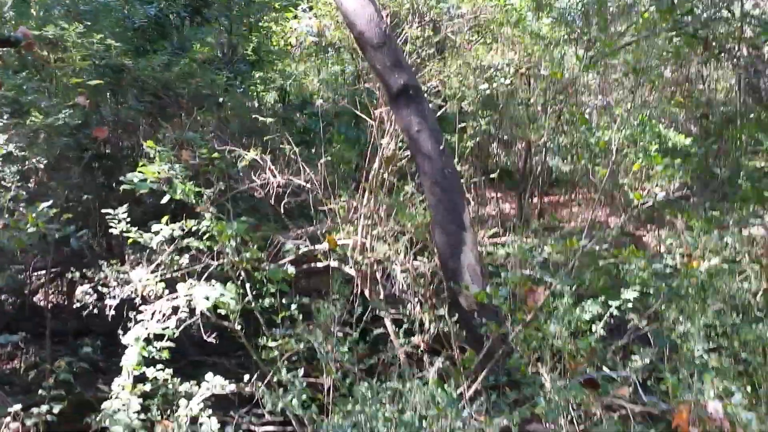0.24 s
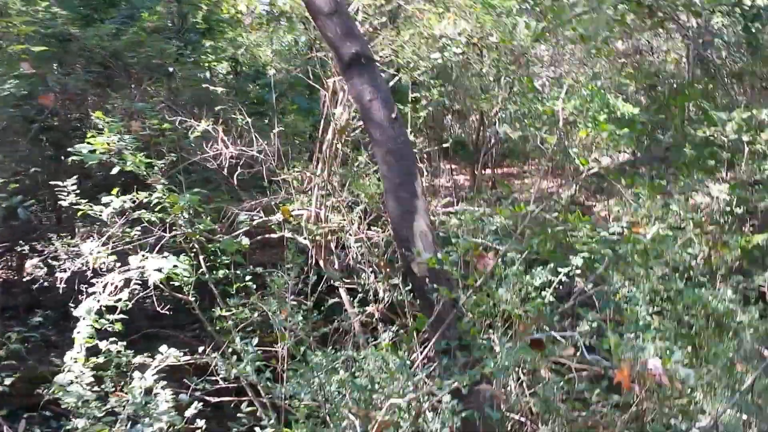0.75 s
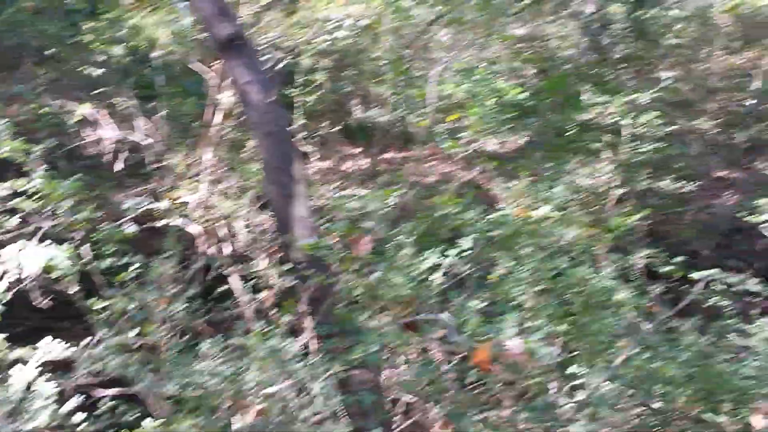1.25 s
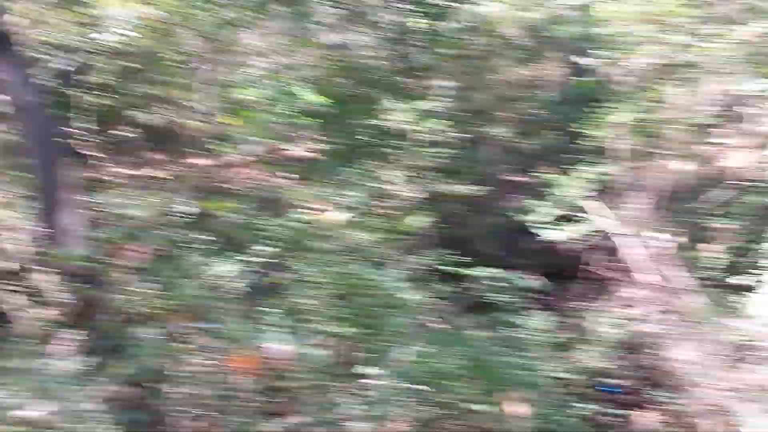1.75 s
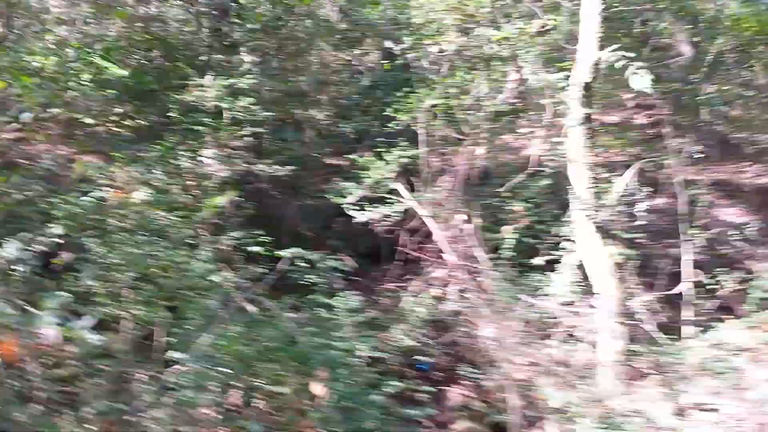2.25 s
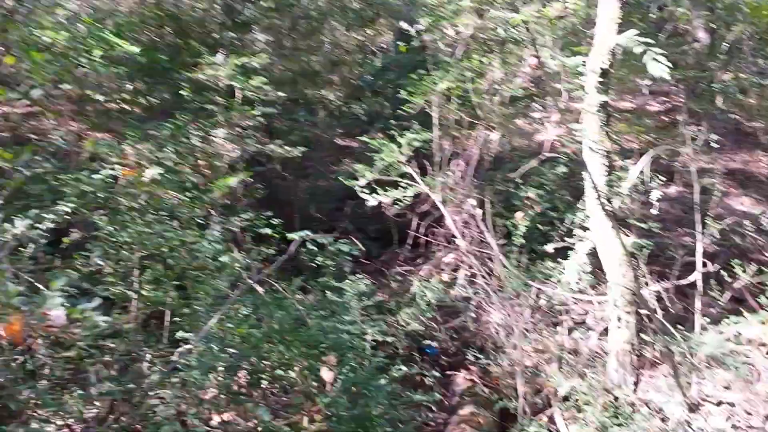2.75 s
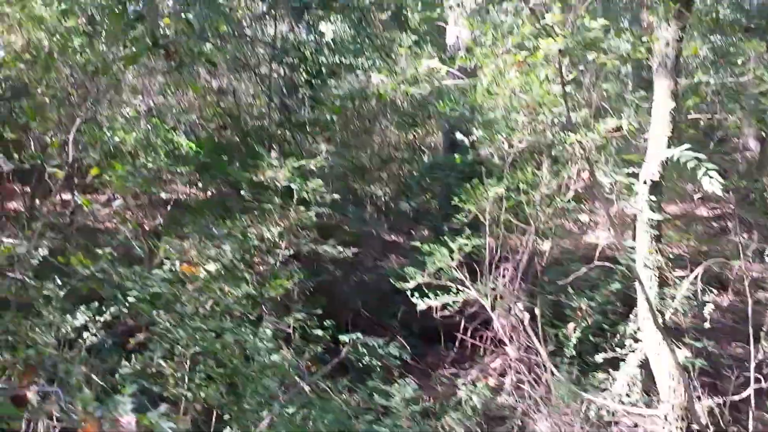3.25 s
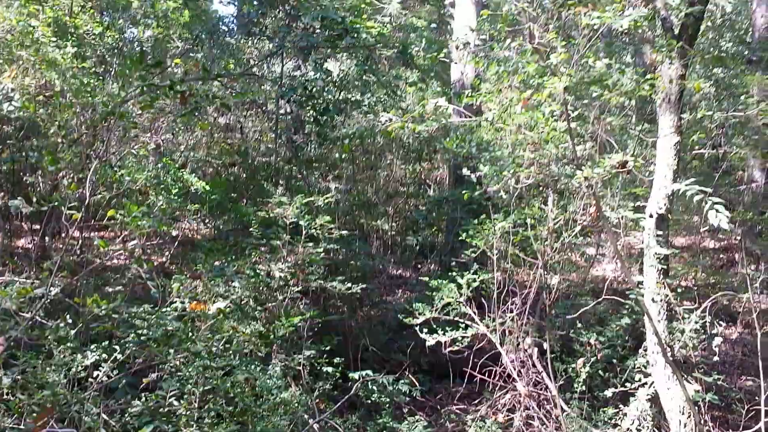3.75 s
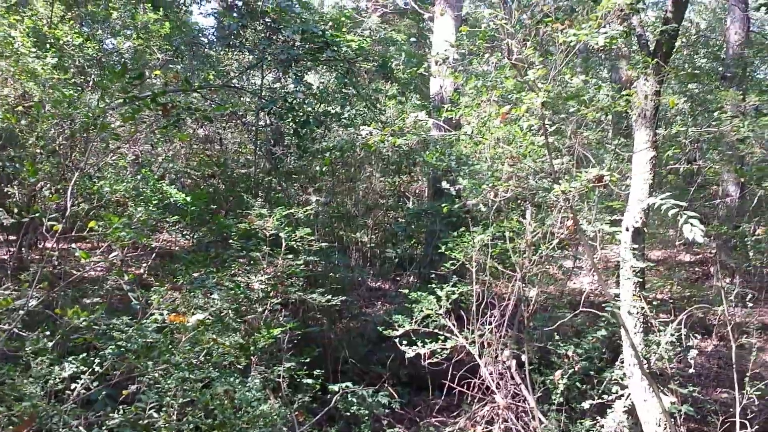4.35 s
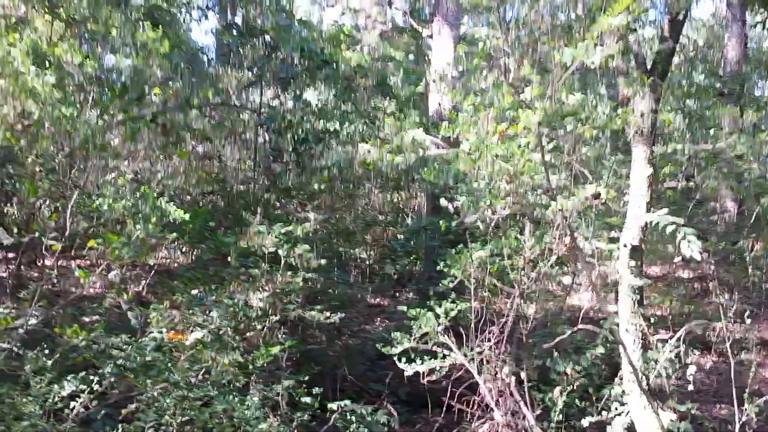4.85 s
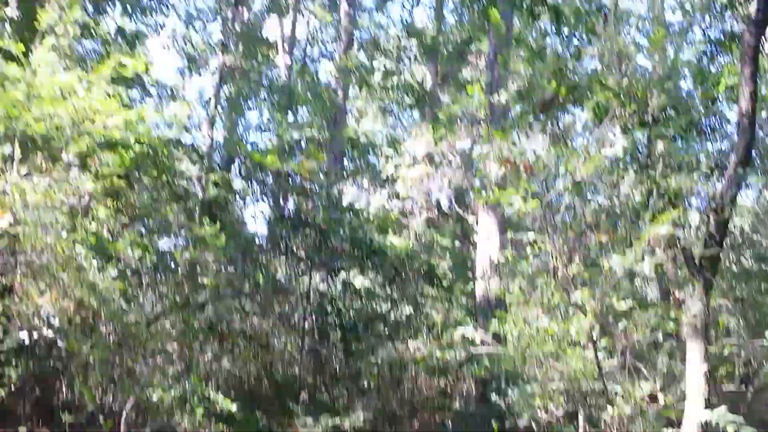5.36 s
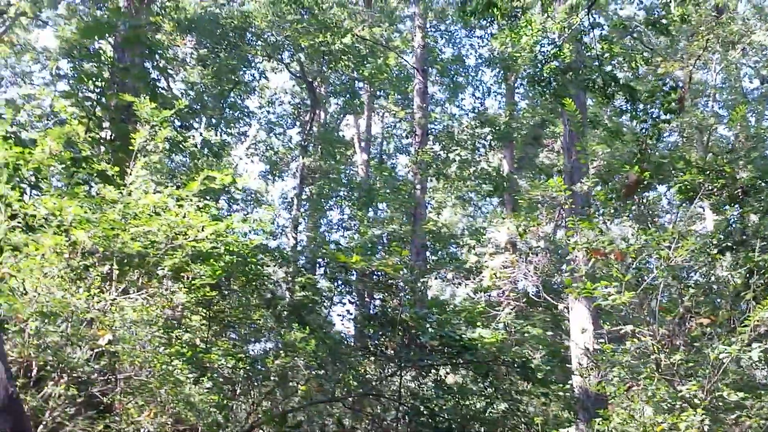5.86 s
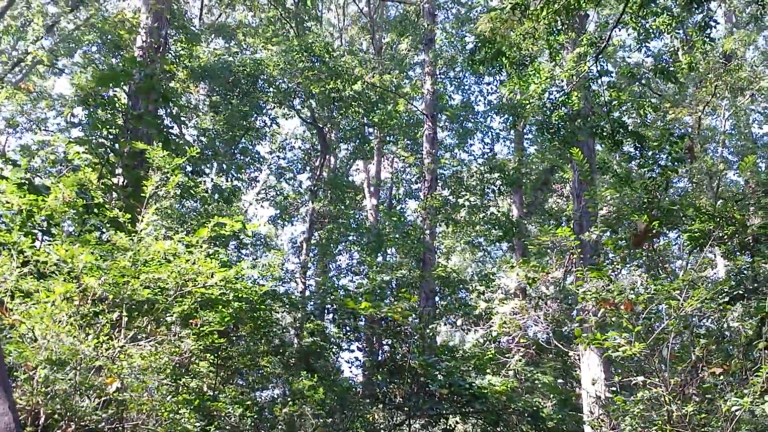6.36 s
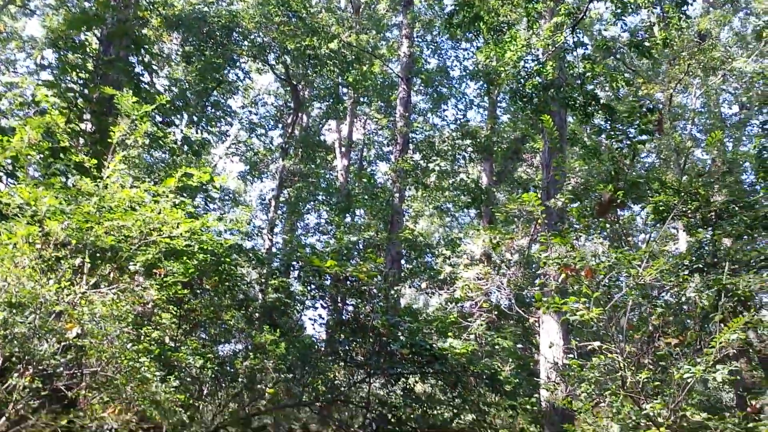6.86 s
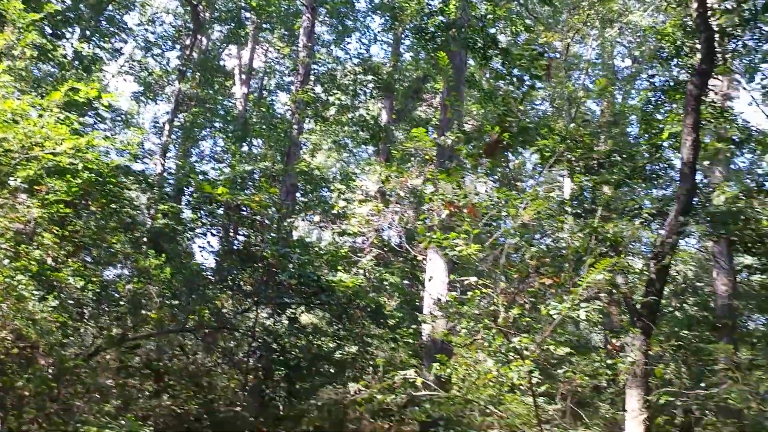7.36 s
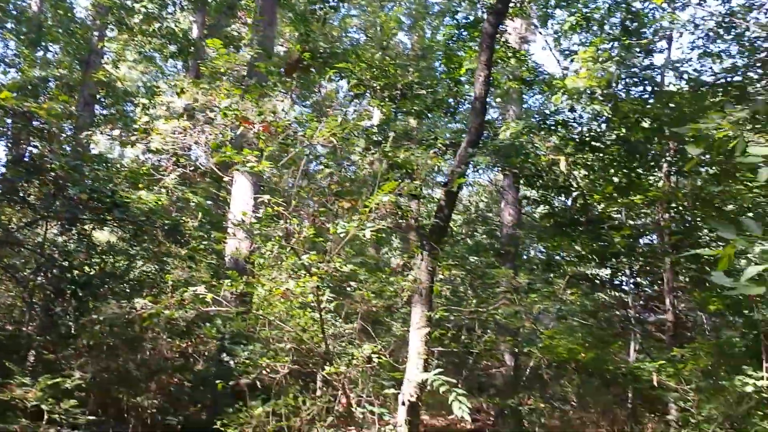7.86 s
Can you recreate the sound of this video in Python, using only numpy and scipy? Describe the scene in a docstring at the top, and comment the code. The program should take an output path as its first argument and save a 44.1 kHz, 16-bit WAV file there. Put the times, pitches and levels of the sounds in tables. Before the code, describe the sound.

Crickets trill in a shrill, steady chorus in woodland, with a few dry leaf crackles, twig ticks and a faint distant engine rumble.

```python
"""From the start, crickets trill in a sunny wood by stridulation: two near ones stroke about 15 times a
second over a far chorus near 7 kHz and faster, thinner trills. Under them lie soft air, hiss and a far
engine's swelling rumble. Within a second come a dull bump and the first crackles of dry leaves; then twigs
tick and light gusts pass. At 6.5 s a small animal chips once, a falling whistle scattered by the trees.
The rumble swells a last time as the engine sinks in pitch."""
import sys
import numpy as np
from scipy import signal
from scipy.fft import rfft, irfft, next_fast_len
from scipy.io import wavfile
from scipy.ndimage import uniform_filter1d

SR = 44100
rng = np.random.default_rng(int(sys.argv[2]) if len(sys.argv) > 2 else 0)


def to_wav(s):
    """Save 16-bit WAV."""
    ch = np.atleast_2d(s).T  # columns
    pcm = np.round(np.clip(ch, -1, 1) * 32767)  # PCM
    wavfile.write(sys.argv[1], SR, pcm.astype(np.int16))


N = 357651
TIME = np.arange(N) / SR
BINS = np.fft.rfftfreq(N, 1 / SR)


def gain_of(db):
    """Decibels to amplitude ratio."""
    return 10 ** (np.asarray(db) / 20)


def stereo(left_db, right_db):
    """A gain for each ear."""
    return gain_of([[left_db], [right_db]])


def unit_rms(x):
    """Normalises each channel to an rms of 1."""
    return x / np.sqrt(np.mean(x ** 2, axis=-1, keepdims=True) + 1e-20)


def curve(rows):
    """Linear interpolation of each column over time."""
    times, *columns = np.transpose(rows)
    return np.array([np.interp(TIME, np.sort(times), c) for c in columns])


def spectrum(rows):
    """Interpolation of each column over log frequency."""
    hz, *columns = np.transpose(rows)
    return np.array([np.interp(np.log(BINS + 1), np.log(hz + 1), c) for c in columns])


def add(mix, start_s, sound):
    """Superposes a sound on a stereo mix."""
    part = mix[:, max(round(start_s * SR), 0):][:, :sound.shape[-1]]
    part += sound[..., :part.shape[-1]]


def drift(per_s):
    """Random fluctuation of about unit size."""
    return np.interp(TIME * per_s, np.arange(6000), rng.standard_normal(6000))


def coloured(x, gain):
    """Filtering: multiplies the spectrum by a gain given on BINS."""
    size = next_fast_len(x.shape[-1], True)
    hz = np.fft.rfftfreq(size, 1 / SR)
    shape = np.array([np.interp(hz, BINS, g) for g in np.atleast_2d(gain)])
    return irfft(rfft(x, size) * shape, size)[:, :x.shape[-1]]


def resonance(hz, octaves):
    """A broad peak with gentle skirts."""
    return 1 / (1 + (np.log2((BINS + 1) / hz) / octaves) ** 2)


def scatter(x, t60_s=0.6, paths=3):
    """Reverberation by scattering from trunks and leaves; the paths change as the listener turns."""
    t = np.arange(SR) / SR
    tails = rng.standard_normal((paths, 2, SR)) * gain_of(-60 * t / t60_s) * (1 - np.exp(-t / 0.0017))
    tails /= np.linalg.norm(tails, axis=-1, keepdims=True)
    weights = [np.cos(np.pi * (0.668 * TIME + k / paths)) * np.sqrt(2 / paths) for k in range(paths)]
    return sum(signal.fftconvolve(np.atleast_2d(x * weight), tail, axes=1)[:, :N]
               for weight, tail in zip(weights, tails))


def cricket(strokes, per_s, top_hz, waver_hz, detune_hz, lag_cycles=0.52):
    """Stridulation: each wing stroke draws a scraper over a file, giving a tone that arches and sags."""
    attack_s, half_hold_s, release_s = 0.0035, 0.0085, 0.009
    swell_db, sag_hz = 0.5, 100
    stroke = np.round(strokes).astype(int)
    _, jitter, detune = rng.standard_normal((256, 3))[stroke % 256].T
    from_middle_s = (strokes - stroke) / per_s + 0.00056 * jitter
    along = np.clip(from_middle_s / half_hold_s, -2, 2)  # -1 to 1 during the hold
    hz = top_hz - sag_hz * along ** 2 + detune_hz * detune + waver_hz * drift(400)
    # the scraper bites, presses harder along the file, and lifts
    bite = (half_hold_s + from_middle_s) / attack_s
    lift = (half_hold_s - from_middle_s) / release_s
    contact = np.clip(1 + np.minimum(bite, lift), 0, 1)
    pressure = contact ** 2 * gain_of(swell_db * along / 2)
    lag = lag_cycles * drift(2.02)  # interaural phase shifts as the listener turns
    return np.sqrt(2) * pressure * np.sin(2 * np.pi * (np.cumsum(hz) / SR + np.array([lag, -lag]) / 2))


def near_cricket(start_s, per_s, top_hz, wet_db, flutter):
    """Amplitude modulation: leaves in the path make a close cricket flutter differently at each ear."""
    strokes = np.cumsum(per_s) / SR - start_s * per_s[0]
    song = cricket(strokes, per_s, top_hz, waver_hz=13.17, detune_hz=7.87, lag_cycles=0.33)
    leaves = 1 + flutter * np.array([drift(330), drift(270)])
    return song * leaves + gain_of(wet_db) * scatter(song[0])


# The nearest cricket swells on the left as the listener turns: (time [s], left [dB], right [dB])
NEAREST_LEVELS = [(0, -38.7, -42), (1.2, -39.3, -40.5), (1.7, -41, -39.5), (1.95, -34.3, -39),
                  (2.6, -30.8, -39), (3.1, -32.7, -38), (3.7, -34.5, -38), (4.3, -35.5, -37.5),
                  (5.3, -37, -41), (6.1, -39.7, -42), (7.0, -37.5, -42), (7.8, -34.7, -39.7)]
# Its neighbour moves toward the right ear: (time [s], left [dB], right [dB])
NEIGHBOUR_LEVELS = [(0, -38, -45), (0.8, -40.5, -44), (1.8, -40.5, -42.5), (2.3, -42, -41), (3.1, -42, -46),
                    (4.2, -40.5, -39.5), (5.3, -43, -41.5), (6.5, -43.5, -41.5), (8.1, -48, -47)]


def near_pair():
    """Interaural level differences place two close crickets, each with its own pace and pitch."""
    slowing_per_s = 14.771 - 0.01225 * TIME
    settling_per_s = np.where(TIME < 1.97, 15.43, 14.61)
    nearest = near_cricket(-0.03, slowing_per_s, top_hz=7130, wet_db=-17, flutter=0.08)
    neighbour = near_cricket(0.019, settling_per_s, top_hz=7385, wet_db=-12, flutter=0.16)
    return gain_of(curve(NEAREST_LEVELS)) * nearest + gain_of(curve(NEIGHBOUR_LEVELS)) * neighbour


# Pairs of far crickets: (mean top frequency [Hz], stroke rate [1/s], left [dB], right [dB])
FAR_CRICKETS = [(6950, 16, -47.5, -55), (7054, 14.5, -49.5, -57), (7300, 14.8, -44.8, -48.5),
                (7424, 15, -51.5, -60)]


def chorus(swell_db=-3.5):
    """Direct and scattered sound arrive with equal power, half blurring the far crickets' strokes."""
    out = np.zeros((2, N))
    for hz, per_s, left_db, right_db in FAR_CRICKETS:
        songs = np.zeros((2, N))
        for offset_hz in (-45, 45):
            strokes = per_s * (1 + 0.03 * rng.normal()) * TIME + rng.random() + 0.1184 * drift(1.5)
            songs += cricket(strokes, per_s, hz + offset_hz, waver_hz=25, detune_hz=35)
        heard = unit_rms(scatter(songs[0])) + unit_rms(songs)
        out += stereo(left_db, right_db) * unit_rms(heard * gain_of(swell_db * drift(0.96)))
    return out


# Small insects: (frequency [Hz], half width [Hz], pulse rate [1/s], left [dB], right [dB])
TRILL_BANDS = [(7815, 55, 49, -60, -55.5), (7560, 150, 59, -54, -54), (5945, 200, 53, -58.5, -76),
               (5930, 450, 68, -57.5, -80), (6700, 130, 90, -52, -61)]


def trills(depth=0.98, swell_db=-2.3):
    """Modulated narrow-band noise: fast insect strokes, blurred by the undergrowth."""
    out = np.zeros((2, N))
    for hz, width_hz, per_s, left_db, right_db in TRILL_BANDS:
        band = unit_rms(coloured(rng.standard_normal((2, N)), np.exp(-((BINS - hz) / width_hz) ** 2)))
        pulsing = 1 + depth * np.cos(2 * np.pi * (per_s * TIME + 0.56 * drift(2.2)))
        out += stereo(left_db, right_db) * unit_rms(band * pulsing * gain_of(swell_db * drift(1.54)))
    return out


# Likeness of diffuse sound at the two ears: (frequency [Hz], correlation [-1 to 1])
COHERENCE = [(60, 1), (130, 0.96), (290, 0.84), (640, 0.51), (1410, -0.17), (3100, 0.058), (6820, 0.047),
             (15000, -0.35)]


def diffuse_noise(colour, side_db):
    """Interaural coherence: in a diffuse field the ears share the bass but not the treble."""
    a, b = rng.standard_normal((2, N))
    gain = gain_of(spectrum(colour)[0])
    coherence = np.clip(spectrum(COHERENCE)[0], -1, 1)
    shared = coloured(a, gain * np.sqrt(1 + coherence))[0]
    opposed = coloured(b, gain * np.sqrt(1 - coherence))[0]
    return unit_rms(np.array([shared + opposed, shared - opposed])) * stereo(side_db, -side_db)


# Spectrum of far air: (frequency [Hz], relative level [dB])
AIR_SPECTRUM = [(20, -11.5), (60, -13), (120, -0.5), (170, -3), (260, -4.5), (420, -8.5), (686, -12),
                (857, -12.5), (1510, -21.5), (2210, -27.5), (2600, -55), (4000, -93)]


def air(level_db=-51.5, waver_db=0.5):
    """Ambient noise: a soft, diffuse wash of far air."""
    return gain_of(level_db + waver_db * drift(3.5)) * diffuse_noise(AIR_SPECTRUM, side_db=0.78)


# Swells of the rumble: (peak time [s], level [dB], rise [s], fall [s])
RUMBLE_SWELLS = [(.2, -55, .3, 0.74), (1.79, -43, 0.31, 0.32), (2.55, -61.5, 0.52, 1),
                 (5.3, -55, 0.13, 0.33), (7.08, -41.5, 0.89, 0.68), (7.68, -45, 0.14, 0.39)]


def swelling(calm_db=-58):
    """The rumble's envelope: swells add in power to a calm floor."""
    swells = [gain_of(db) * np.exp(-abs((TIME - s) / np.where(TIME < s, rise, fall)) ** 1.76)
              for s, db, rise, fall in RUMBLE_SWELLS]
    return np.sqrt(gain_of(calm_db) ** 2 + np.sum(np.square(swells), axis=0))


# Spectra of the far engine's rumble and its undertone: (frequency [Hz], relative level [dB])
RUMBLE_SPECTRUM = [(29, -20), (50, -24), (95, -1), (129, -7.5), (162, 2), (188, -4), (236, -1.5),
                   (292, -11), (326, -14.5), (354, -17), (450, -26), (580, -52), (990, -120)]
UNDERTONE_SPECTRUM = [(15, -18), (35, -5.5), (55, 6.5), (100, 4), (125, 6), (170, -34)]


def rumble(deep_floor_db=-54, deep_share_db=-15):
    """Common modulation: a low rumble and its deep undertone swell together."""
    swell = swelling()
    body = swell * diffuse_noise(RUMBLE_SPECTRUM, side_db=1.4)
    deep_gain = np.hypot(gain_of(deep_floor_db), gain_of(deep_share_db) * swell)
    return body + deep_gain * diffuse_noise(UNDERTONE_SPECTRUM, side_db=1.6)


# Spectral density of the hiss: (frequency [Hz], left [dB per Hz], right [dB per Hz])
HISS_SPECTRUM = [(1430, -118, -118), (2520, -103, -104), (3820, -92.5, -95), (4180, -95.5, -95),
                 (5500, -88.5, -93), (6120, -84.5, -88.5), (7180, -69.5, -70), (7900, -88.5, -83),
                 (8370, -103, -100), (11400, -106, -98), (12200, -106, -101), (14600, -110, -101.5)]


def hiss(flicker_db=1.1):
    """Incoherent sources, foliage and far insects, merge into smooth noise."""
    noise = coloured(rng.standard_normal((2, N)), gain_of(spectrum(HISS_SPECTRUM))) * np.sqrt(SR / 2)
    return noise * gain_of(flicker_db * drift(25))


# The far engine's sinking fundamental: (time [s], frequency [Hz])
ENGINE_FUNDAMENTAL = [(0, 180), (3.3, 178), (5.4, 171), (6.3, 167.5), (6.8, 165), (7.3, 162), (8.1, 159)]


def engine(above_rumble_db=-9, octave_db=-58, waver_hz=2.18, fading_db=4):
    """Harmonics of a far engine: the fundamental hums in the rumble, the octave joins its last swell."""
    cycles = np.cumsum(curve(ENGINE_FUNDAMENTAL)[0] + waver_hz * drift(14)) / SR
    last_swell = np.exp(-((TIME - 6.9) / 0.87) ** 2)
    hum = gain_of(above_rumble_db + fading_db * drift(5.5)) * swelling() * np.sin(2 * np.pi * cycles)
    octave = gain_of(octave_db + fading_db * drift(6)) * last_swell * np.sin(4 * np.pi * cycles)
    return np.sqrt(2) * (hum + octave)


def whine(hz=12096, left_db=-94, right_db=-84):
    """A pure tone: high, steady and very faint."""
    return stereo(left_db, right_db) * np.sqrt(2) * np.sin(2 * np.pi * hz * TIME)


# Soft dull bumps: (time [s], level [dB], frequency [Hz], half width [octaves], decay [s])
BUMP_EVENTS = [(0.563, -46, 1140, 0.51, 0.005), (1.539, -44.5, 500, 0.77, 0.02),
               (2.765, -39.5, 54, 0.26, 0.026), (5.811, -37, 156, 0.23, 0.012)]


def bumps(rise_s=0.0017):
    """Heavily damped transients: low pushes without any ring, alike in both ears."""
    out, t = np.zeros((2, N)), np.arange(SR // 4) / SR
    for s, db, hz, octaves, decay in BUMP_EVENTS:
        push = unit_rms(coloured(rng.standard_normal(len(t)), resonance(hz, octaves)))
        add(out, s, gain_of(db) * push * np.exp(-t / decay) * (1 - np.exp(-t / rise_s)))
    return out


# Stirrings in dry leaves: (time [s], level [dB], frequency [Hz], rise [s], decay [s])
LEAF_STIRRINGS = [(0.888, -43, 6070, 0.011, 0.023), (1.539, -47, 5240, 0.0033, 0.013),
                  (1.752, -43, 5840, 0.013, 0.052), (2.268, -44.5, 5900, .012, 0.021),
                  (2.395, -41, 5800, 0.005, 0.019), (2.414, -40, 5800, 0.0046, 0.024),
                  (2.455, -48, 5500, .008, 0.029), (2.597, -47, 4850, 0.0055, 0.011),
                  (2.72, -38, 5900, 0.0046, 0.03), (3.558, -50, 5300, 0.004, 0.04),
                  (3.672, -51, 5500, 0.0037, 0.015), (3.754, -46.5, 5360, .005, 0.011),
                  (3.861, -52, 5900, .004, .01), (4.55, -57, 5200, 0.041, 0.024),
                  (5.731, -62, 5500, .07, 0.13), (7.875, -54, 4600, .006, .02)]


def rustles(crackle_db=7, side_db=2.5, wet_db=-3, body_db=-25, crisp_db=-18):
    """Crackling noise: dry leaves give way in runs of tiny random bursts, off to the left."""
    out, t = np.zeros((2, N)), np.arange(SR // 2) / SR
    body = gain_of(body_db) * resonance(1800, 0.91)
    crisp = gain_of(crisp_db) * resonance(8500, 0.1)
    for s, db, hz, rise, decay in LEAF_STIRRINGS:
        noise = rng.standard_normal((2, len(t)))
        grains = np.repeat(rng.standard_normal(len(t)), 24)[:len(t)]  # about 0.5 ms each
        crackle = coloured(noise * gain_of(crackle_db * grains), resonance(hz, 0.33) + body + crisp)
        envelope = np.minimum(t / rise, np.exp((rise - t) / decay))
        add(out, s, gain_of(db) * unit_rms(crackle) * envelope)
    wet = gain_of(wet_db)
    return stereo(side_db, -side_db) * (out + wet * scatter(out, t60_s=0.05)) / np.hypot(1, wet)


# Dry twigs: (time [s], level [dB], frequency [Hz], rise [s], left minus right [dB], crack re tone [dB])
TWIG_SNAPS = [(1.625, -25, 5770, 0.00055, 8, -15), (1.626, -38, 4200, 0.00045, 7, -24),
              (1.6887, -33, 5370, 0.0007, 6, -11), (3.073, -34, 4300, 0.00026, -15, -15),
              (3.496, -35, 2320, 0.00034, 6, -30), (3.5567, -31.5, 5050, 0.00025, 8, -10),
              (5.4867, -21.5, 4300, 0.00028, -20, -19), (5.4866, -22.5, 6440, 0.00028, 3, -11),
              (5.487, -17, 7400, 0.000062, -10, -21)]


def ticks(wet_db=-18):
    """Damped oscillation: a snapping twig rings for a few cycles, with a trace of broadband crack."""
    out, t = np.zeros((2, N)), np.arange(SR // 50) / SR
    for s, db, hz, rise, side_db, crack_db in TWIG_SNAPS:
        crack = gain_of(crack_db) * uniform_filter1d(rng.standard_normal(len(t)), size=3)
        envelope = t / rise * np.exp(1 - t / rise)
        snap = gain_of(db) * envelope * (np.sin(2 * np.pi * hz * t) + crack)
        add(out, s, snap * stereo(min(side_db, 0), min(-side_db, 0)))
    return out + gain_of(wet_db) * scatter(out, t60_s=0.086)


# Light gusts: (peak time [s], level [dB], half length [s])
GUST_EVENTS = [(2.307, -54.5, 0.72), (5.153, -54, 0.34), (6.454, -55.5, 0.31), (7.9, -56, 0.53)]
# Their spectrum: (frequency [Hz], relative level [dB])
GUST_SPECTRUM = [(150, -21), (260, -2), (350, 0), (500, -18), (900, -15), (1300, -21), (2400, -35)]


def gusts():
    """Flow noise: light air stirs the trees in a soft rush that comes and goes."""
    strength = sum(gain_of(db) * np.exp(-((TIME - s) / half) ** 2) for s, db, half in GUST_EVENTS)
    return strength * diffuse_noise(GUST_SPECTRUM, side_db=0.5)


# Leaves throw back the high part of the chip most: (frequency [Hz], gain [dB])
LEAF_REFLECTION = [(4400, -9), (5200, 1), (6200, 14), (7600, 5), (12000, 13)]


def chip(start_s=6.477, length_s=0.034, top_hz=12300, octaves_per_s=45, peak_db=-34, right_db=-9):
    """A frequency sweep: a small animal's steep downward whistle reverberates among the trees."""
    rise_s, rise_db_per_s, fade_db_per_s = 0.029, 900, 3600
    out, t = np.zeros((2, N)), np.arange(0, length_s, 1 / SR)
    hz = top_hz / 2 ** (octaves_per_s * t)
    db = peak_db - np.maximum(rise_db_per_s * (rise_s - t), fade_db_per_s * (t - rise_s))
    whistle = np.sqrt(2) * gain_of(db) * np.sin(2 * np.pi * np.cumsum(hz) / SR)
    add(out, start_s, whistle * signal.windows.tukey(len(t), 0.1))
    echo = scatter(coloured(out, gain_of(spectrum(LEAF_REFLECTION))), t60_s=1.0)
    return stereo(0, right_db) * (out + echo)


def scene():
    """Superposition: the sound pressures of all the sources add."""
    insects = near_pair() + chorus() + trills()
    brief_sounds = rustles() + ticks() + bumps() + chip()
    return insects + brief_sounds + air() + rumble() + hiss() + engine() + gusts() + whine()


# Microphones with two deaf spots, the left duller on top: (frequency [Hz], left [dB], right [dB])
MICROPHONE_RESPONSE = [(2390, 0, -0.5), (2562, -9, -7), (2797, -51, -30.5), (2990, -40, -44),
                       (3333, 2.5, -22), (3295, -3.5, -2), (8255, -0.5, -4.5), (8280, -24, -15),
                       (8650, -49, -51), (9140, -16, -5.5), (11000, -8.5, 0.5), (11600, -2.5, 0)]


def record(dry, cutoff_hz=14560):
    """Linear filtering: the microphones' frequency response, then a low-pass band limit."""
    heard = coloured(dry, gain_of(spectrum(MICROPHONE_RESPONSE)))
    low_pass = signal.firwin(801, cutoff_hz, window=("kaiser", 8), fs=SR)
    return signal.oaconvolve(heard, low_pass[None], "same")


dry = scene()
out = record(dry)
to_wav(out)
```